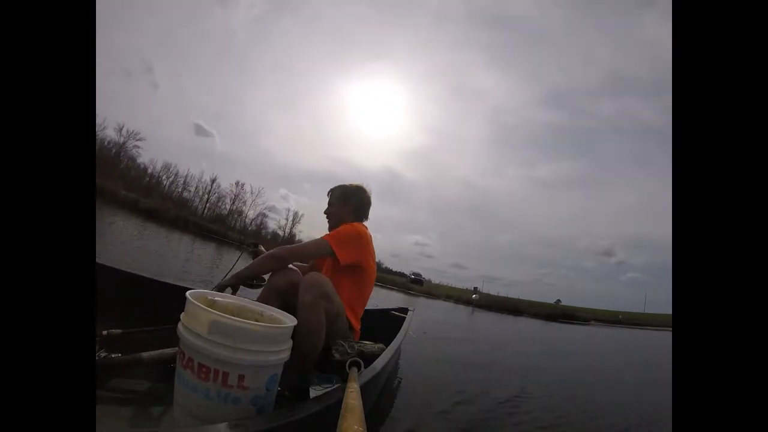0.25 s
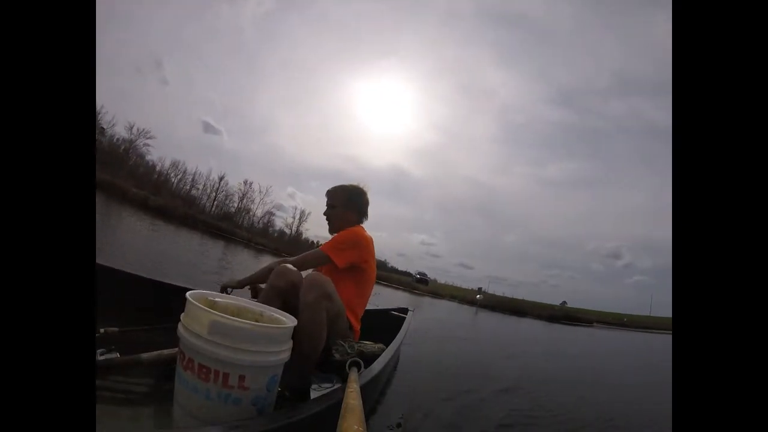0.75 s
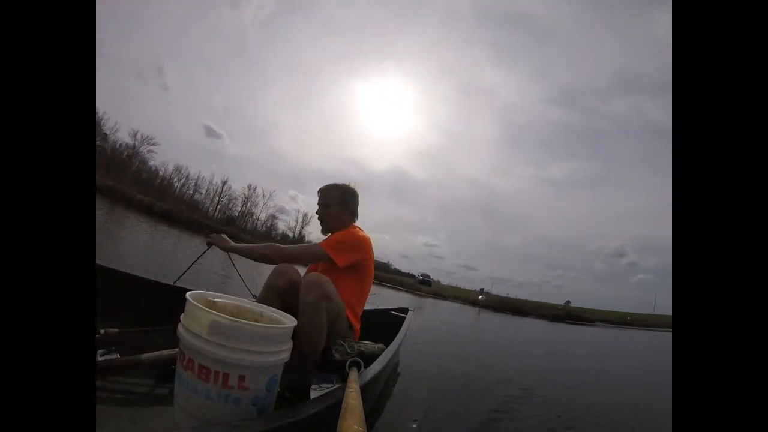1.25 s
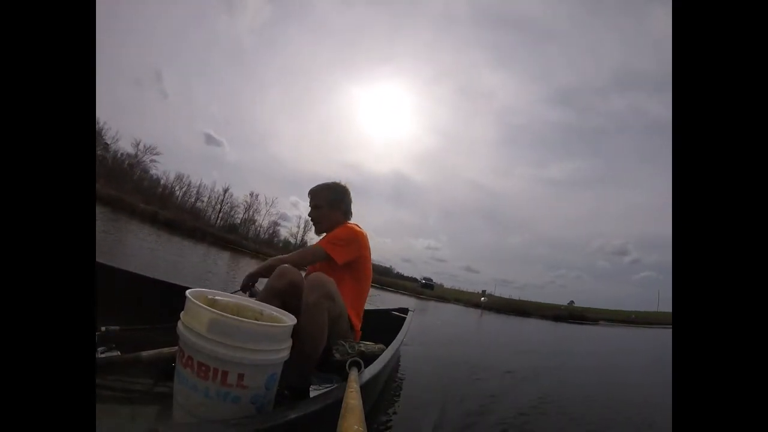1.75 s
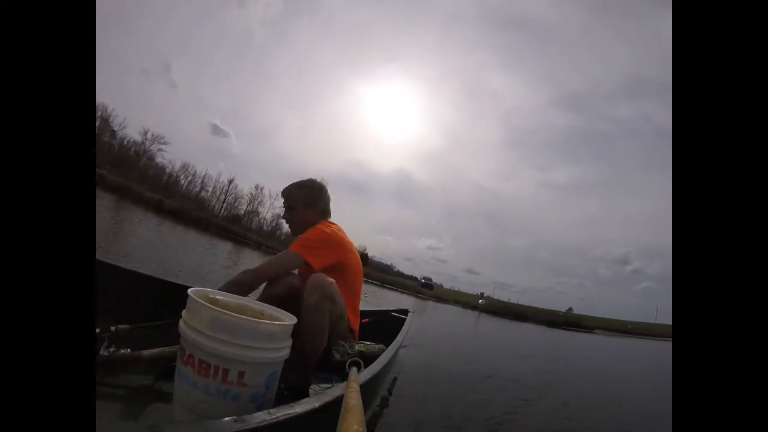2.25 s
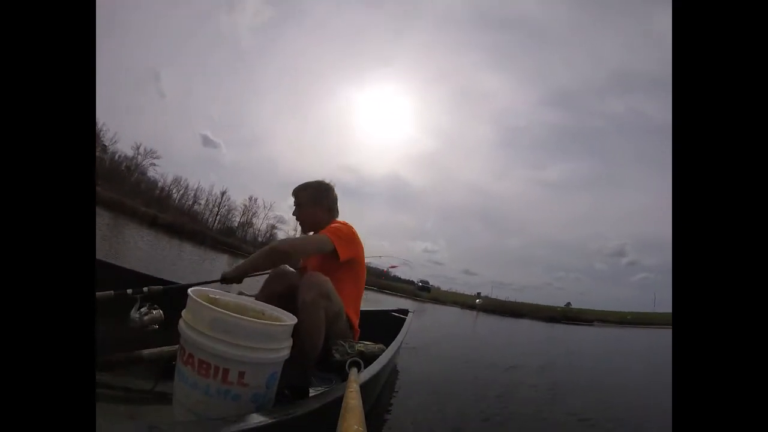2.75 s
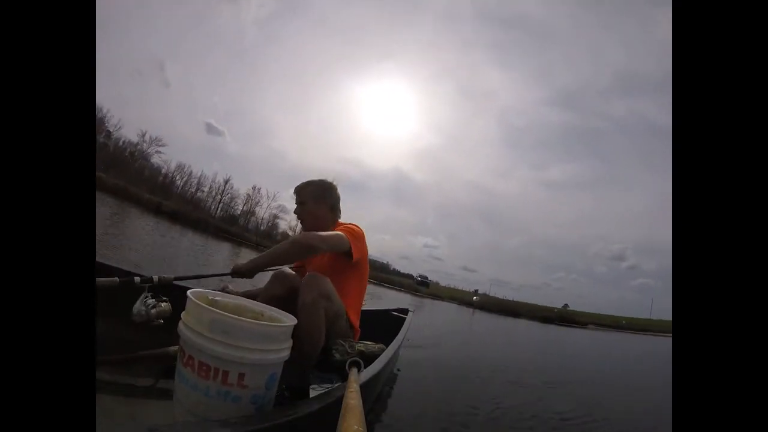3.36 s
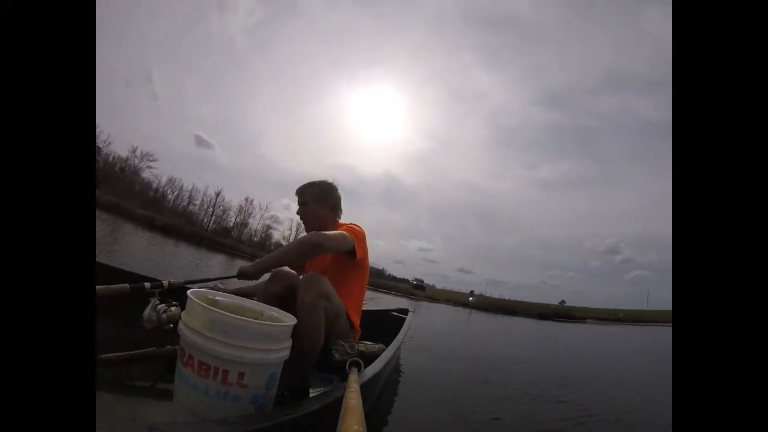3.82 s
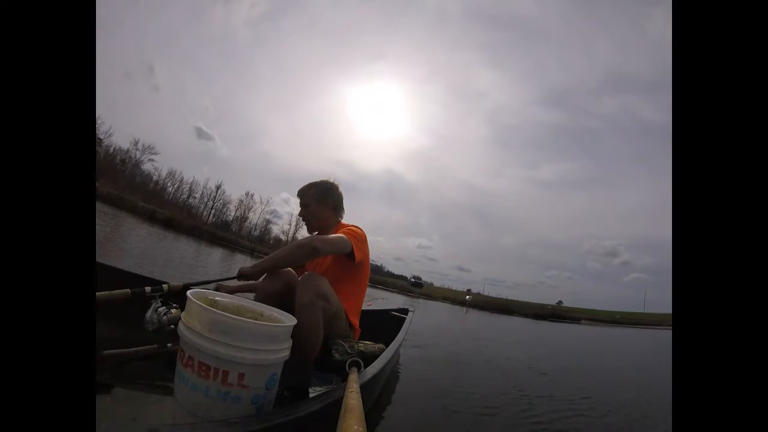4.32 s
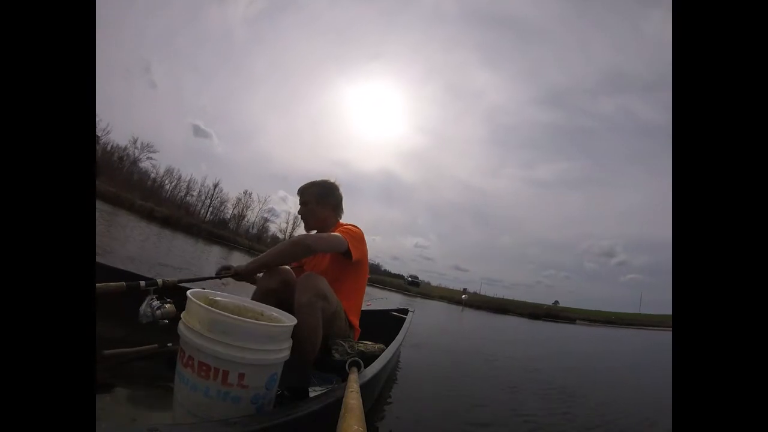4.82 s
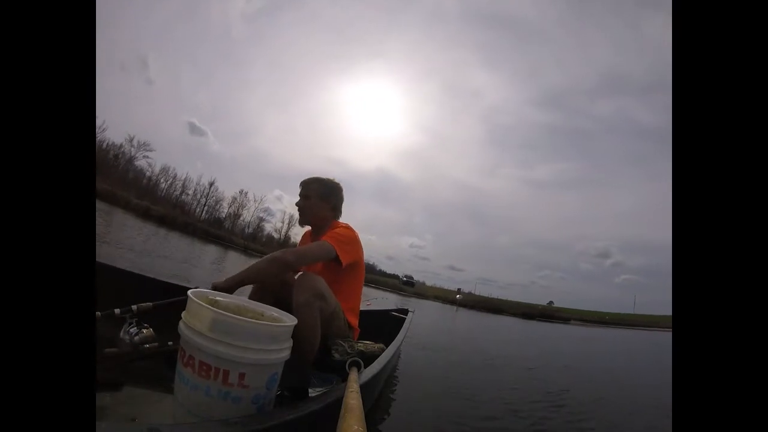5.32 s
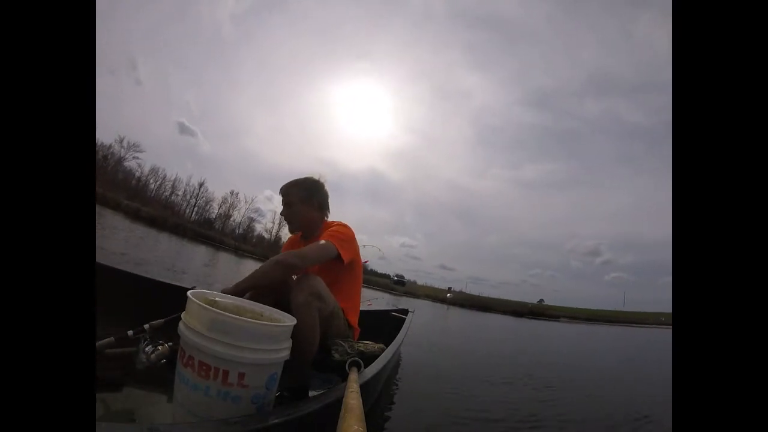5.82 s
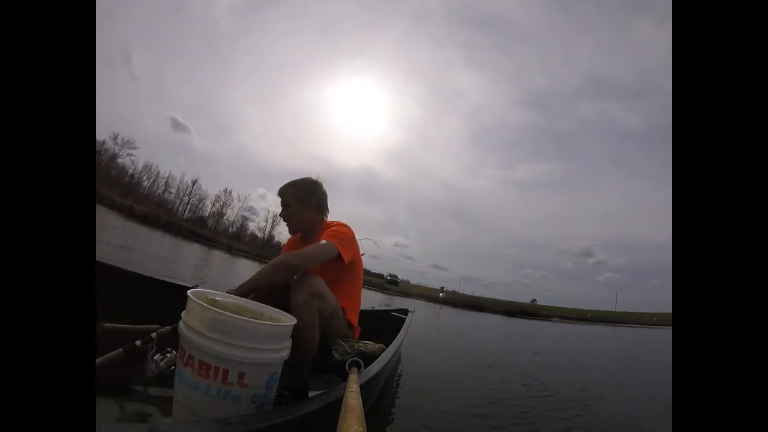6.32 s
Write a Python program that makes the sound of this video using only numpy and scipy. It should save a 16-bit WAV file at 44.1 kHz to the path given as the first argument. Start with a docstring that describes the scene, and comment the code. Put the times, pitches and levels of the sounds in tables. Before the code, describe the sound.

Close and dry in a canoe on open water: a hard, woody paddle knock with a deep hull thump, then small clicks and faint scraping. After a near-quiet pause, a fishing rod and reel clatter brightly against the hull. Heavy dragging follows, with dull thumps, low groans and judder, then gentler rubbing and a final cluster of hollow knocks. Low wind rumble and thin hiss run beneath on the boat-mounted microphone.

```python
"""Over a low wind rumble and faint hiss, gear and a paddle at once knock the hull of a canoe on a still pond.
An angler is sorting tackle: rod and reel clatter in metallic clicks, then the rod is dragged in several strokes.
Blows excite decaying modes of hull, shaft and metal; streams of tiny friction slips, filtered through
resonances, make the strokes hiss, rasp, groan and judder. Squeaks and low drones ring single resonances.
Shaped noise makes the wind gusts and hiss. Everything is close and dry, as at a microphone fixed to the boat."""
import sys
import numpy as np
from scipy import signal
from scipy.fft import rfft, irfft
from scipy.io import wavfile
from scipy.ndimage import uniform_filter1d, map_coordinates

SR = 44100
rng = np.random.default_rng(int(sys.argv[2]) if len(sys.argv) > 2 else 0)


def to_wav(s):
    """Save 16-bit WAV."""
    ch = np.atleast_2d(s).T  # columns
    pcm = np.round(np.clip(ch, -1, 1) * 32767)  # PCM
    wavfile.write(sys.argv[1], SR, pcm.astype(np.int16))


N = 290178
TIME = np.arange(N) / SR
RING_TIME = TIME[:SR // 2]  # the half second given to each blow


def undb(db):
    """Decibels to gain."""
    return 10 ** (np.asarray(db) / 20)


def unit(x):
    """Scale to rms 1."""
    return x / np.sqrt(np.mean(x ** 2))


def colour(x, points, skirt_db=18):
    """Minimum-phase filter through (Hz, dB) points, falling by skirt_db an octave above the last."""
    hz, db = np.transpose(points)
    size = 8192
    grid = np.maximum(np.fft.rfftfreq(size, 1 / SR), 1)
    shape_db = np.interp(np.log(grid), np.log(hz), db)
    shape_db = shape_db - skirt_db * np.maximum(np.log2(grid / hz[-1]), 0)
    # folding the cepstrum forward in time keeps the filter from ringing before the sound
    cepstrum = irfft(np.log(undb(shape_db)))
    cepstrum[1:size // 2] *= 2
    cepstrum[size // 2 + 1:] = 0
    impulse = irfft(np.exp(rfft(cepstrum)))
    return signal.fftconvolve(x, impulse)[:len(x)]


def band(x, edges, kind):
    """Low-, band- or high-pass."""
    return signal.sosfilt(signal.butter(2, edges, kind, fs=SR, output="sos"), x)


def add(out, s, sound):
    """Mix a sound in at time s."""
    i = max(int(s * SR), 0)
    out[i:i + len(sound)] += sound[:N - i]


def decay(t60):
    """Exponential fade by 60 dB in t60 seconds."""
    return np.exp(-np.log(1000) * RING_TIME / t60)


def ring(modes, stretch=1, scatter_db=3, stray=0.0091):
    """Decaying modes; each point of contact gives them other strengths, signs and slight detunings."""
    hz, db, t60 = np.transpose(modes)[:, :, None]
    size, detune, side = rng.standard_normal((len(modes), 3)).T[:, :, None]
    gain = np.sign(side) * undb(db + scatter_db * size)
    tone = np.sin(2 * np.pi * hz * (1 + stray * detune) * RING_TIME)
    return np.sum(gain * decay(t60 * stretch) * tone, axis=0)


def burst(points, t60, tail_db, tail_t60):
    """Dense modes as coloured noise: a quick crack and a weaker, longer tail."""
    fade = decay(t60) + undb(tail_db) * decay(tail_t60)
    return unit(colour(fade * rng.standard_normal(len(RING_TIME)), points))


def contact(rise_s):
    """The force of a blow builds up while the two surfaces press together."""
    return 1 - np.exp(-(RING_TIME / rise_s) ** 2)


def strength(x, db, size):
    """Set the rms level of the first size samples of a blow."""
    return x * undb(db) / np.sqrt(np.mean(x[:size] ** 2))


def walk(rate):
    """Random levels held 1 / rate s and smoothed twice; spread near 1."""
    k = int(SR / rate)
    held = rng.standard_normal(N)[np.arange(N) // k]
    return np.sqrt(2) * uniform_filter1d(uniform_filter1d(held, k), k)


def slips(rate, spread_db):
    """Tiny impacts at random times, rate a second on average, of very uneven size."""
    size = undb(spread_db * np.clip(rng.standard_normal(N), -2, 2)) * rng.choice([-1, 1], N)
    return unit(size * (rng.random(N) < rate / SR))


def resonate(x, hz, width_hz):
    """A resonance whose centre glides: shift it to zero, smooth, and shift it back."""
    turn = np.exp(2j * np.pi * np.cumsum(hz) / SR)
    pole = np.exp(-np.pi * width_hz / SR)
    return np.real(turn * signal.lfilter([1 - pole], [1, -pole], x / turn))


def gesture(start, end, db, swell_db, attack_s, release_s):
    """Gain of one hand movement: it sets in, swells or fades evenly, and dies away (20 dB per time given)."""
    progress = np.clip((TIME - start) / (end - start), 0, 1)
    outside = np.maximum(start - TIME, 0) / attack_s + np.maximum(TIME - end, 0) / release_s
    return undb(db + swell_db * (progress - .5) - 20 * outside)


WIND_DB = -40.5  # rumble between gusts
# gusts and lulls on the microphone: centre_s, half_length_s, change_db
GUSTS = [(0.05, 0.014, -9), (1.244, 0.065, 4.5), (1.553, 0.12, -9.5), (2.64, 0.28, 5.5), (3.389, 0.15, 15),
         (3.825, 0.046, 11), (5.71, 0.3, 6), (6.15, 0.036, 8), (6.53, 0.2, 15)]
# spectrum of the wind rumble: freq_hz, relative_level_db
WIND_COLOUR = [(12, 2), (25, 6), (38, 12), (60, 7.5), (100, -2), (200, -9), (500, -46)]
# course of the steady hiss: time_s, level_db
HISS_LEVEL = [(0, -66.5), (.8, -72.5), (1.6, -66), (2.8, -64), (6.58, -62)]
# spectrum of the hiss: freq_hz, relative_level_db
HISS_COLOUR = [(300, 2), (900, -1.5), (1800, -7), (2900, -10.5), (4200, -18.5), (5700, -15.5),
               (6200, -10.5), (6550, -1.5), (7300, -8), (9300, -12), (10200, -19.5), (13200, -16.5),
               (14000, -60.5)]


def air():
    """Eddies buffet the microphone, harder in each gust, over a smooth hiss."""
    wind_db = WIND_DB + sum(db * np.exp(-((TIME - s) / half_s) ** 2) for s, half_s, db in GUSTS)
    rumble = unit(colour(rng.standard_normal(N), WIND_COLOUR)) * undb(0.36 * walk(rate=7.0))
    hiss = unit(colour(rng.standard_normal(N), HISS_COLOUR))
    hiss_db = np.interp(TIME, *np.transpose(HISS_LEVEL))
    return undb(wind_db) * rumble + undb(hiss_db) * hiss


def flex(modes, dense, dense_db, stretch, rise_s):
    """One part of the hull struck: its clear modes over many quickly damped ones."""
    clear = unit(ring(modes, stretch, scatter_db=4.5))
    crack = burst(dense, t60=0.091 * stretch, tail_db=-47.0, tail_t60=0.98)
    return unit(contact(rise_s) * (clear + undb(dense_db) * crack))


SHOVE_HZ, SHOVE_T60_S = 122.2, 0.04


def shove():
    """The bottom gives under the weight and springs back: a dull thud of barely two swings."""
    swing = np.sin(2 * np.pi * SHOVE_HZ * RING_TIME) * decay(SHOVE_T60_S)
    return unit(contact(rise_s=0.0025) * swing)


SHOVE_DB = -1.5  # the bottom's first give, against its ringing
RING_SHARE = 0.97  # decay time of the loaded hull, as a factor on its modes
PANEL_NOTE_DB, PANEL_T60_S = -0.5, 0.074  # struck panel's note against the clack; decay before stretching
CLACK_REACH = 2.94  # a clack's overtones fade above this multiple of the panel's note
GRAZE_DB = -5.5  # the first touch, against the clack
# blows on the hull: start_s, clack_db, thump_db, hollow_body_db, panel_pitch_hz
KNOCKS = [(0.064, -25, -11.5, -18.5, 660), (0.076, -27.5, -27, -25.5, 586), (0.118, -63, -37, -47, 540),
          (0.14, -38.5, -15.5, -23, 678), (0.165, -50, -40, -45, 634), (0.179, -52, -33, -47, 637),
          (0.193, -48.5, -48, -40, 686), (0.322, -56, -37.5, -48.5, 530), (0.446, -48, -34.5, -38.5, 1226),
          (0.482, -41, -30.5, -34.5, 587), (0.5, -45, -53, -52, 633), (0.578, -56, -56, -61, 1210),
          (0.724, -45, -30, -34, 553), (0.746, -48.5, -50, -37, 530), (0.788, -62, -38, -43.5, 537),
          (0.944, -68, -56, -40.5, 640), (1.844, -53, -42.5, -39.5, 814), (1.946, -41.5, -38, -31, 536),
          (2.153, -46.5, -35.5, -38.5, 623), (2.212, -27, -49.5, -29.5, 1218),
          (2.229, -44, -28.5, -30, 930), (2.245, -32, -33, -34.5, 1243), (2.409, -46.5, -64, -61, 910),
          (2.457, -41, -61, -31.5, 997), (2.65, -35, -44, -38, 645), (2.728, -34.5, -26, -24, 1326),
          (2.768, -43, -20.5, -26, 626), (2.97, -49, -41, -46, 866), (3.204, -51, -30, -29, 527),
          (3.277, -42, -20.5, -27, 630), (3.309, -56, -19, -33, 570), (3.326, -45.5, -35, -37, 1430),
          (3.371, -61, -20.5, -41, 590), (3.425, -47, -25.5, -28.5, 556), (3.55, -60, -35, -46, 600),
          (3.667, -63, -37.5, -40.5, 800), (3.751, -61, -42, -37.5, 605), (3.777, -46.5, -33, -29.5, 770),
          (3.891, -52.5, -34.5, -33, 920), (4.082, -53, -40, -30, 620), (4.147, -50, -51, -28, 620),
          (4.176, -52, -49, -27, 630), (4.27, -74, -40, -55, 595), (4.42, -63, -41, -42, 546),
          (4.646, -80, -35.5, -55, 550), (5.1, -57, -33, -40, 596), (5.419, -59, -29, -67, 560),
          (5.502, -49, -28.5, -31, 890), (5.671, -73, -26, -33, 557), (5.86, -68, -32, -52, 560),
          (5.995, -53, -34, -35.5, 524), (6.036, -61, -23.5, -36.5, 600), (6.088, -34, -24.5, -19, 1100),
          (6.099, -37, -24.5, -21, 610), (6.131, -40.5, -22.5, -50, 1170), (6.161, -38, -25, -26.5, 660),
          (6.217, -44.5, -30.5, -32, 820), (6.253, -51, -38, -40, 650), (6.356, -36.5, -28, -23.5, 577),
          (6.378, -41, -23, -29.5, 590), (6.397, -44, -19.5, -29, 553), (6.456, -46, -33, -52, 1046),
          (6.516, -58, -50, -37, 553), (6.547, -39.5, -35, -27, 635)]
# clear modes of the hull with its load, before stretching: pitch_hz, relative_level_db, t60_s
HULL = [(90.6, -13, 0.06), (94.8, 5, 0.16), (139, 2.5, 0.11), (185.2, 7.5, 0.13), (219, 6, 0.13),
        (275.2, 1, 0.17), (327.3, 1.5, 0.078), (381.3, -6.5, 0.14), (415, -19.5, 0.2), (540, -11, 0.16),
        (666, -8.5, 0.083), (663, -10, 0.13), (841, -9.5, 0.12), (962, -9.5, 0.054), (1227, -20, 0.12),
        (1470, -8, 0.014)]
# dense modes of the hull's bottom, sides and panels, each: freq_hz, relative_level_db
BOTTOM_COLOUR = [(25, -18), (55, -1.5), (120, 5.5), (185, 0), (260, -18), (700, -61.5)]
SIDE_COLOUR = [(120, -41.5), (220, 4.5), (350, 7), (450, -4.5), (700, -37.5), (2000, -78.5)]
PANEL_COLOUR = [(330, -18.5), (540, -0.5), (900, -6.5), (1300, -10), (1700, -27), (2400, -22.5),
                (5000, -40), (10000, -108)]


def knocks():
    """Heavy, soft blows flex the bottom and sides; hard ones make the struck panel clack at its own note."""
    out = np.zeros(N)
    hull = np.array(HULL)
    bottom, sides, panels = np.split(hull, np.searchsorted(hull[:, 0], [198, 490]))  # split in Hz
    for s, clack_db, thump_db, body_db, panel_hz in KNOCKS:
        # a heavy thing stays on the hull after the blow and damps it
        stretch = RING_SHARE * np.interp(clack_db, [-31, -24], [1.1, .6])
        stretch = stretch * np.interp(thump_db, [-21, -15], [1, .65])
        thump = flex(bottom, BOTTOM_COLOUR, dense_db=1.5, stretch=1.24 * stretch, rise_s=0.0021)
        thump = thump + undb(SHOVE_DB) * shove()
        body = flex(sides, SIDE_COLOUR, dense_db=-4.0, stretch=stretch, rise_s=0.0024)
        clack = flex(panels, PANEL_COLOUR, dense_db=-5, stretch=1.03 * stretch, rise_s=0.00018)
        clack = clack + undb(PANEL_NOTE_DB) * unit(ring([(panel_hz, 0, PANEL_T60_S)], stretch))
        clack = band(clack, CLACK_REACH * panel_hz, "low")
        add(out, s, strength(thump, thump_db, size=1100))
        add(out, s, strength(body, body_db, size=1100))
        add(out, s, strength(clack, clack_db, size=500))
        # an edge grazes the panel just before the full weight lands
        graze = contact(rise_s=0.0012) * burst(PANEL_COLOUR, t60=0.033, tail_db=-35.0, tail_t60=.1)
        graze = band(graze, CLACK_REACH * panel_hz, "low")
        add(out, s - .004, strength(graze, clack_db + GRAZE_DB, size=300))
    return out


# reel and rod guides striking the boat: start_s, bright_ring_db, lower_rattle_db
CLICKS = [(0.0698, -50, -48), (0.074, -54, -53), (0.127, -56, -65), (0.271, -51, -58), (0.334, -53.5, -64),
          (0.34, -50.5, -59.5), (0.4427, -47, -50.5), (0.463, -56, -64), (0.4828, -44, -45),
          (0.537, -49.5, -62), (0.549, -45.5, -55.5), (0.562, -56, -59), (0.574, -63, -57),
          (0.598, -60, -65), (0.652, -56.5, -61.5), (0.67, -56, -64), (0.7398, -47.5, -51.5),
          (0.747, -53, -54), (2.213, -38, -41.5), (2.218, -41.5, -43), (2.234, -50, -50),
          (2.2515, -36.5, -39.5), (2.274, -39, -59), (2.288, -52, -52), (2.302, -37, -42.5),
          (2.307, -45, -47.5), (2.347, -47, -63), (2.363, -54, -60), (2.408, -38.5, -43),
          (2.423, -40, -45.5), (2.452, -34.5, -52), (2.459, -28, -38), (2.463, -31, -40), (2.488, -51, -68),
          (2.499, -42, -51), (2.511, -46, -64), (2.526, -44, -57), (2.554, -42, -44.5), (2.584, -54, -60),
          (2.597, -57, -61), (2.636, -52, -56), (2.649, -54, -51.5), (2.672, -57, -65), (2.7, -62, -71),
          (2.726, -35.5, -40.5), (2.73, -47, -41.5), (2.743, -44, -51), (2.845, -62, -54),
          (2.967, -50.5, -52), (3.3251, -42.5, -45.5), (6.035, -52, -51.5), (6.043, -55, -49),
          (6.0874, -36.5, -36.5), (6.099, -35.5, -36), (6.1217, -40, -47), (6.128, -60, -39),
          (6.14, -59, -51), (6.16, -53, -55), (6.188, -67, -61), (6.2446, -56, -61), (6.255, -56, -63),
          (6.323, -58, -55), (6.3786, -54, -48), (6.391, -54, -54), (6.458, -61, -55.5),
          (6.548, -48, -45.5), (6.56, -51, -53)]
# nominal modes of rod, guides and reel: pitch_hz, relative_level_db, t60_s
REEL = [(1528, -11, 0.14), (1780, -3.5, 0.088), (2264, -5, 0.07), (2380, 0.5, 0.07), (2806, -8, 0.081),
        (3305, -5, 0.05), (4060, -4, 0.03), (4370, -7, 0.04), (5020, 9.5, 0.036), (5350, 1, 0.04),
        (5540, 10, 0.027), (5500, 11.5, 0.034), (5990, 0, 0.045), (6110, 6, .05), (6350, 5, 0.022),
        (6560, 7, 0.034), (7920, -5.5, 0.045), (9700, -11, 0.024), (10280, -13, 0.043)]
# dense upper modes of reel and loose tackle: freq_hz, relative_level_db
REEL_COLOUR = [(600, 4), (1400, 16), (2500, 16.5), (3800, 18), (5500, 20), (6500, -1), (7400, 2.5),
               (9000, -5), (10700, -10), (12000, -22), (14000, -77)]


def clicks():
    """The reel and rod guides strike the boat: a crack and a short metallic ring."""
    out = np.zeros(N)
    for s, bright_db, rattle_db in CLICKS:
        metal = unit(ring(REEL, scatter_db=5, stray=.008))
        blow = undb(-2) * metal + burst(REEL_COLOUR, t60=0.028, tail_db=-13, tail_t60=0.12)
        blow = blow * contact(rise_s=0.00082)
        bright = strength(band(blow, 5600, "high"), bright_db, size=260)
        rattle = strength(band(blow, [1300, 3300], "band"), rattle_db, size=700)
        add(out, s, bright + rattle)
    return out


# the paddle dropping on the hull: start_s, level_db
PADDLE_HITS = [(0.0765, -23), (0.0825, -24.5), (0.149, -36.5), (2.253, -35), (6.1, -30)]
# nominal modes of the paddle shaft: pitch_hz, relative_level_db, t60_s
PADDLE = [(538, -3.5, 0.061), (684, -1, 0.055), (960, -3, 0.017), (1240, -6.5, 0.028), (1520, -21.5, 0.037),
          (1800, -19, 0.029), (2300, -26, 0.025)]


def paddle():
    """The paddle lands hard and its shaft rings briefly, like a wooden bar."""
    out = np.zeros(N)
    for s, db in PADDLE_HITS:
        shaft = ring(PADDLE, scatter_db=1, stray=.002)
        add(out, s, strength(shaft, db, size=500))
    return out


RATTLE_ATTACK_S, RATTLE_RELEASE_S = 0.018, 0.02  # time to rise or fall by 20 dB
# bouts of shaken tackle: start_s, end_s, mid_level_db, swell_from_start_to_end_db
RATTLES = [(0.165, 0.227, -66.5, -7), (0.31, 0.425, -67.5, 2.5), (0.497, 0.558, -57, 16),
           (0.606, 0.825, -65.5, 1), (2.24, 2.372, -51.5, -5), (2.456, 2.576, -44, -13),
           (2.58, 2.723, -58.5, -6)]


def shaking():
    """How hard the tackle is shaken, as a gain."""
    return sum(gesture(*bout, RATTLE_ATTACK_S, RATTLE_RELEASE_S) for bout in RATTLES)


SCRAPE_DB = -4  # scrape against chatter
# dense modes of the small tackle: freq_hz, relative_level_db
TACKLE_COLOUR = [(700, -5), (1400, -28), (2600, 3), (4200, -18), (5000, -7), (5450, 9), (5950, -2),
                 (6500, 0), (7300, -4), (8200, 1), (9000, -6), (10300, -21), (11300, -23), (13000, -39)]


def loose_tackle(count=8):
    """Many small metal parts chatter and scrape while the rod is moved; each rings at its own pitches."""
    chatter = 0
    for pitch in np.geomspace(.99, 1.01, count):
        modes = np.array(REEL) * [pitch, 1, 1]
        part = undb(-1) * unit(ring(modes, stretch=0.7, scatter_db=6, stray=.003))
        part = part + burst(TACKLE_COLOUR, t60=0.0086, tail_db=-34, tail_t60=0.063)
        taps = slips(rate=16, spread_db=4.5)
        chatter = chatter + signal.oaconvolve(taps, part * contact(rise_s=0.00047))[:N]
    scrape = colour(slips(rate=6000, spread_db=3), TACKLE_COLOUR) * undb(4.5 * walk(rate=130))
    return shaking() * unit(unit(chatter) + undb(SCRAPE_DB) * unit(scrape))


STROKE_ATTACK_S, STROKE_RELEASE_S = 0.087, 0.084  # time to rise or fall by 20 dB
REST_GROAN_DB, REST_JUDDER_DB = -63.5, -62  # the boat is never quite still between strokes
# gear dragged over the hull: start_s, end_s, hiss_db, groan_db, judder_db, swell_from_start_to_end_db
STROKES = [(0.3, 0.65, -68.5, -52.5, -45.5, 3), (0.761, 0.996, -73.5, -54, -69, -1),
           (1.104, 1.37, -79, -64.5, -48, -2), (1.807, 2.04, -64.5, -66, -81, 4.5),
           (2.268, 2.391, -53.5, -41.5, -44, -14.5), (2.518, 2.579, -63, -32.5, -36, 0.5),
           (2.837, 3.067, -58, -41.5, -35.5, 1.5), (3.087, 3.114, -67, -34, -43, -2),
           (3.204, 3.262, -57, -34.5, -33.5, -0.5), (3.281, 3.483, -49, -33.5, -28.5, 1),
           (3.542, 3.553, -68, -40.5, -31.5, -6), (3.772, 3.847, -58, -35, -40, 0),
           (3.934, 4.057, -60.5, -39, -41.5, -4), (4.075, 4.222, -55.5, -33, -35.5, -0.5),
           (4.785, 5.132, -67, -39.5, -41.5, 13.5), (5.184, 5.513, -59.5, -43, -40.5, 2.5),
           (5.584, 5.704, -58.5, -43, -31, -5), (5.766, 5.876, -69, -47.5, -38, -7),
           (5.994, 6.27, -64, -39, -40.5, 0.5), (6.367, 6.597, -70.5, -38.5, -36, 3.5)]


def strokes():
    """Gains of hiss, groan and judder: in each stroke all three share one shape."""
    out = np.zeros((3, N))
    for start, end, hiss_db, groan_db, judder_db, swell_db in STROKES:
        shape = gesture(start, end, 0, swell_db, STROKE_ATTACK_S, STROKE_RELEASE_S)
        out += np.outer(undb([hiss_db, groan_db, judder_db]), shape)
    hiss, groan, judder = out
    return hiss, groan + undb(REST_GROAN_DB), judder + undb(REST_JUDDER_DB)


ROD_T60_S = 0.14
ROD_WANDER = 0.003  # share by which the rod's modes shift as the grip moves
# long-ringing modes of the rubbed rod: pitch_hz, relative_level_db
ROD = [(1604, -72), (1863, -67.5), (2062, -70), (2213, -70.5), (2342, -75), (2530, -72.5), (2939, -74),
       (3203, -77.5), (3284, -77), (4081, -85), (4360, -73), (4544, -70.5), (4888, -73), (5179, -87),
       (5421, -85), (5922, -74), (6304, -70), (6729, -70.5)]


def through(force, ring_db):
    """Friction heard directly and through the rod's modes, which shift as the grip moves."""
    modes = [(hz, db, ROD_T60_S) for hz, db in ROD]
    ringing = signal.fftconvolve(force, ring(modes, scatter_db=1, stray=.001))[:N]
    # reading the ringing at a wandering speed bends its pitch
    position = np.cumsum(1 + ROD_WANDER * walk(rate=4))
    ringing = map_coordinates(ringing, [position], mode="mirror")
    return unit(force) + undb(ring_db) * unit(ringing)


GROAN_HZ, GROAN_WANDER, GROAN_WANDER_PER_S = 329.8, 0.035, 7  # centre note, share it strays, rate of straying
RASP_WITH_HISS_DB, RASP_WITH_GROAN_DB = -3, -26.5  # the rasp grows with both
# spectra of judder, groan and rasp, each: freq_hz, relative_level_db
JUDDER_COLOUR = [(40, -48.5), (80, 3), (135, -2), (190, -9.5), (260, -8.5), (500, -71)]
GROAN_COLOUR = [(130, -19.5), (215, 4), (275, -3.5), (335, -10), (410, -0.5), (480, -8), (560, -20),
                (635, -8), (740, -42), (1300, -33.5)]
RASP_COLOUR = [(400, -2.5), (700, -1.5), (950, -3.5), (1600, -16.5), (1900, -17.5), (2300, -18.5),
               (3000, -20.5), (4000, -22.5), (8000, -25)]


def dragging(hiss_gain, groan_gain, judder_gain):
    """Gear sticks and slips: the hull judders and groans under a dry rasp; the note moves with the contact."""
    force = slips(rate=350, spread_db=4.5) * undb(3.2 * walk(rate=31))
    judder = unit(colour(force, JUDDER_COLOUR))
    note_hz = GROAN_HZ * (1 + GROAN_WANDER * walk(rate=GROAN_WANDER_PER_S))
    note = unit(resonate(force, note_hz, width_hz=12.5))
    groan = unit(unit(colour(force, GROAN_COLOUR)) + undb(4.0) * unit(colour(note, GROAN_COLOUR)))
    grit = slips(rate=2000, spread_db=4.5) * undb(2 * walk(rate=140))
    rasp = unit(colour(through(grit, ring_db=-10), RASP_COLOUR))
    rasp_gain = undb(RASP_WITH_HISS_DB) * hiss_gain + undb(RASP_WITH_GROAN_DB) * groan_gain
    return judder_gain * judder + groan_gain * groan + rasp_gain * rasp


# spectrum of the sliding rod: freq_hz, relative_level_db
SLIDE_COLOUR = [(1200, -13), (1900, -2.5), (2400, -3.5), (3600, -2.5), (4500, -0.5), (5400, 10.5),
                (6300, 4), (7100, -6.5), (9000, -12.5), (11000, -34), (13000, -51)]


def sliding_rod(hiss_gain):
    """Fine friction makes the rod hiss and sing; it swells with the hand's pressure and flutters as it catches."""
    grit = slips(rate=3500, spread_db=5) * undb(1.5 * walk(rate=22) + 2.6 * walk(rate=80))
    return hiss_gain * unit(colour(through(grit, ring_db=-4), SLIDE_COLOUR))


# brief squeals of the sliding rod: start_s, length_s, pitch_hz, level_db
SQUEAKS = [(1.404, 0.007, 3290, -65), (2.326, 0.019, 5510, -41), (2.593, 0.02, 5700, -49),
           (2.79, 0.36, 4580, -55), (3.018, 0.036, 5460, -53), (6.021, 0.03, 5740, -48),
           (6.228, 0.075, 2060, -59), (6.345, 0.047, 2020, -56)]


def squeaks():
    """For a moment the friction rings one resonance of the rod, roughly."""
    out = np.zeros(N)
    for s, length, hz, db in SQUEAKS:
        size = int(length * SR)
        friction = rng.standard_normal(size)
        ringing = resonate(friction, np.full(size, hz), width_hz=.02 * hz)
        ringing = unit(band(ringing, [hz / 1.25, hz * 1.13], "band"))
        add(out, s, undb(db) * np.hanning(size) * ringing)
    return out


DRONE_ATTACK_S, DRONE_RELEASE_S = 0.054, 0.019  # time to rise or fall by 20 dB
DRONE_WANDER, DRONE_FLUTTER_DB = 0.012, -0.5  # share by which the note strays; unevenness of its level
# the hull's side singing under even sliding: start_s, end_s, pitch_hz, mid_level_db, swell_from_start_to_end_db
DRONES = [(2.887, 3.144, 341, -39, 7.5), (3.758, 4.0, 333, -45, -10), (4.137, 4.172, 326, -30, 4)]


def drones():
    """Even sliding locks on to one resonance of the hull: a nearly pure, slightly unsteady low tone."""
    out = np.zeros(N)
    for start, end, hz, db, swell_db in DRONES:
        phase = 2 * np.pi * np.cumsum(hz * (1 + DRONE_WANDER * walk(rate=14))) / SR
        tone = unit(np.sin(phase) * undb(DRONE_FLUTTER_DB * walk(rate=34)))
        out += tone * gesture(start, end, db, swell_db, DRONE_ATTACK_S, DRONE_RELEASE_S)
    return out


def scene():
    """Open water gives no echo: all is heard close and dry."""
    hiss, groan, judder = strokes()
    struck = knocks() + clicks() + paddle() + loose_tackle()
    rubbed = dragging(hiss, groan, judder) + sliding_rod(hiss) + squeaks() + drones()
    return (air() + struck + rubbed)[None]


TOP_HZ = 13800


def record(dry):
    """Soft saturation rounds the loudest peaks, then a steep low-pass cuts the top."""
    ceiling = 0.8
    rounded = ceiling * np.tanh(dry / ceiling)
    return signal.sosfilt(signal.ellip(8, .2, 80, TOP_HZ, fs=SR, output="sos"), rounded)


dry = scene()
out = record(dry)
to_wav(out)
```